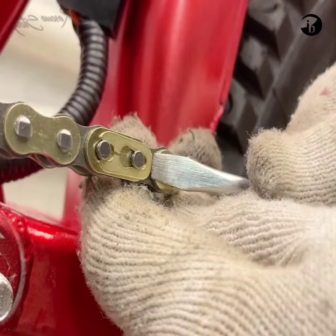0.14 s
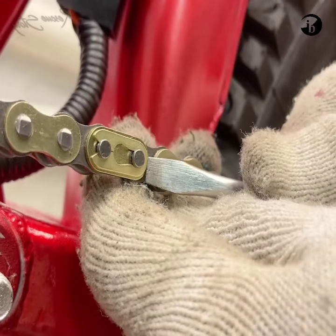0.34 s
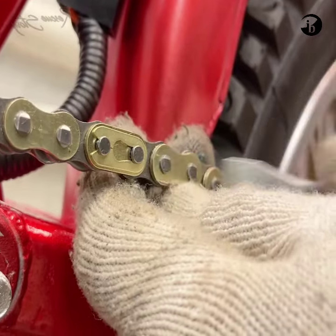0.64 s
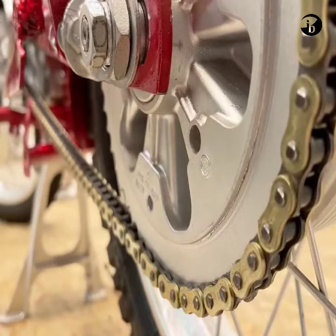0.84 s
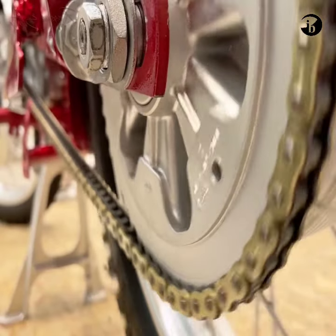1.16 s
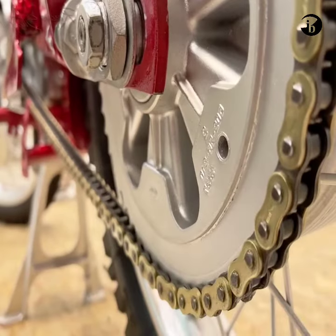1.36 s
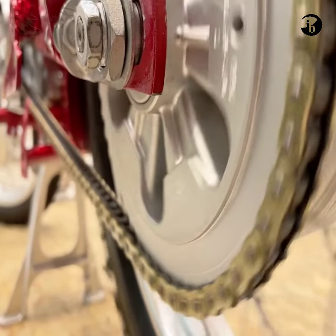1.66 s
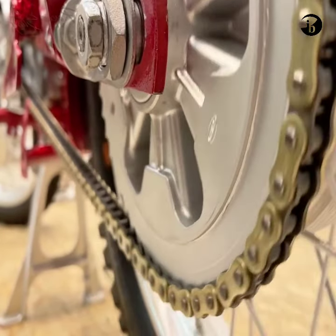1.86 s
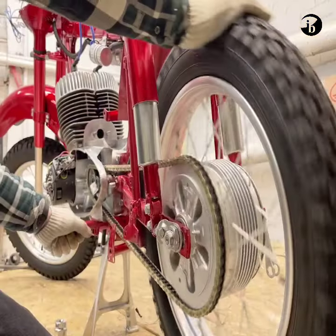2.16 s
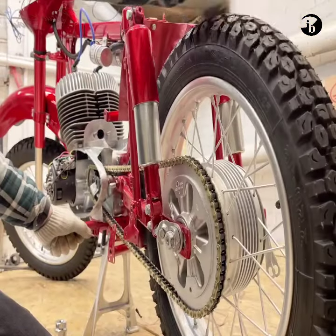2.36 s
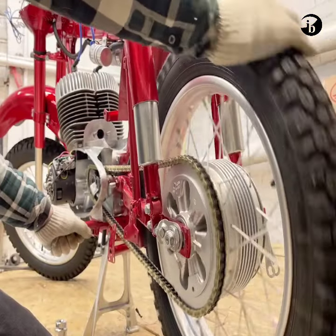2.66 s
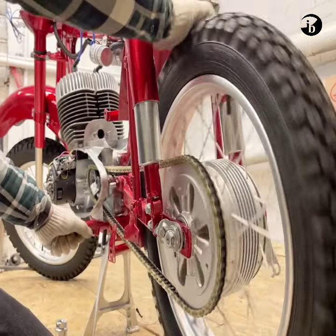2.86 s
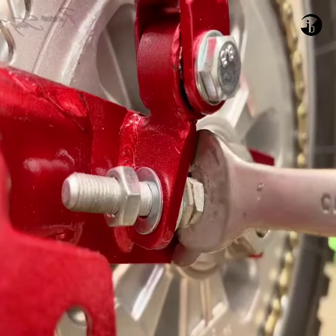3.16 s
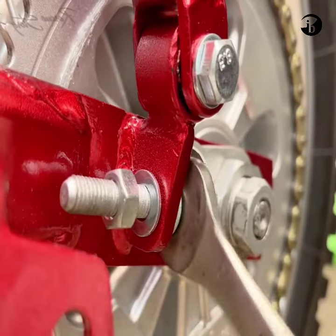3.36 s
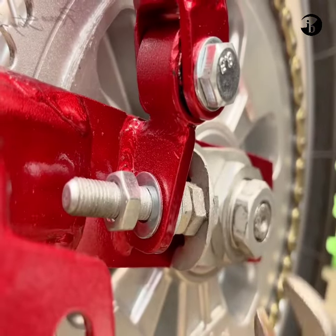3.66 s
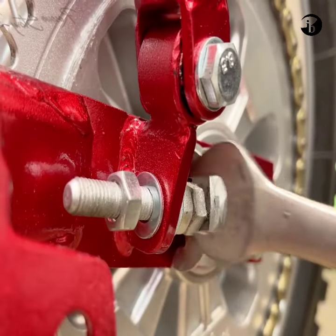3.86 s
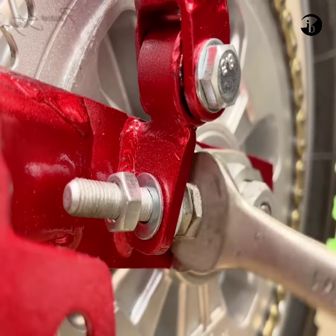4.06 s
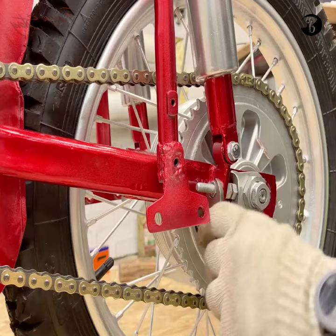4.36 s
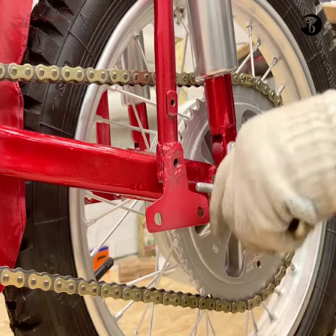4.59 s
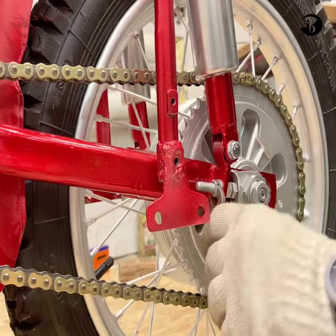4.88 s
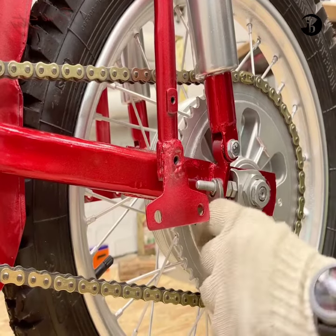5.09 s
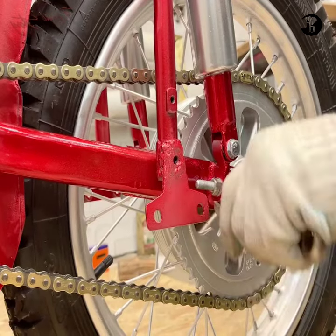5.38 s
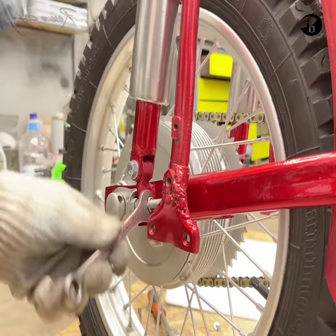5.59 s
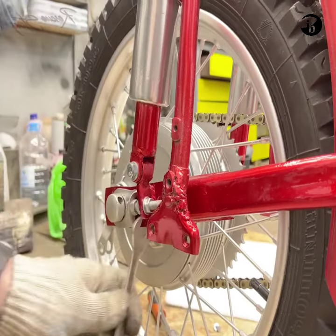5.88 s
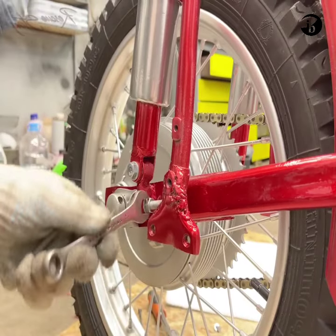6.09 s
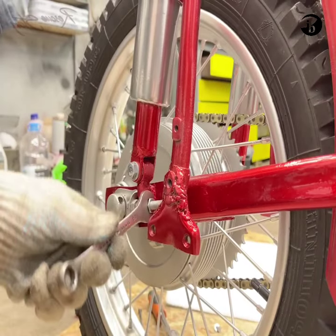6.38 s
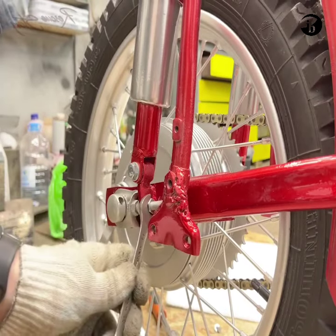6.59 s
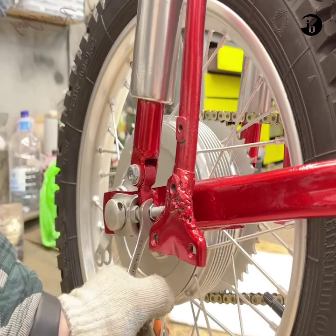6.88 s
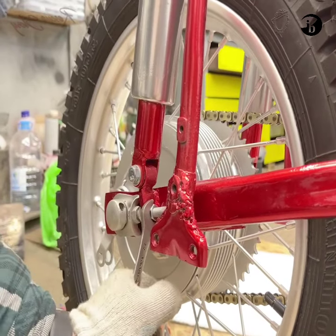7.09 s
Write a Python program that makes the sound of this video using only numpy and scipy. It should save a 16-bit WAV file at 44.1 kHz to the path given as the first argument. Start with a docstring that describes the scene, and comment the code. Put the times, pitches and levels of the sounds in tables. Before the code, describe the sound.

Close up in a small workshop, a clip on a motorcycle chain seats with tiny steel clicks and a dull knock over a fan-like hum. The wheel is then pushed four times, its chain rattling and knocking in swells. At about three seconds the hum stops abruptly, leaving quiet air, sharp ringing spanner clinks on nuts and brief gritty rustles.

```python
"""Fitting a motorcycle drive chain

In a small workshop, close to the microphone and in a few short scenes, a master link's spring clip snaps home:
quick steel clicks over a dull knock. Four pushes turn the wheel, and link knocks ring it while rollers rattle.
The workshop hum cuts off; an open spanner clinks (ringing steel) on the adjuster nuts, amid swells of grainy noise.
Behind lie coloured noise for fan, hum, still air and rumble, wavering tones, and short echoes from the room."""
import sys
import numpy as np
from scipy import signal
from scipy.fft import rfft, irfft
from scipy.io import wavfile

SR = 44100
rng = np.random.default_rng(int(sys.argv[2]) if len(sys.argv) > 2 else 0)


def file_out(sig):
    """Save sig as 16-bit WAV at sys.argv[1]."""
    # one column per channel
    cols = np.atleast_2d(sig).T
    # limit, then scale
    lim = np.clip(cols, -1, 1)
    pcm = np.round(lim * 32767).astype(np.int16)
    wavfile.write(sys.argv[1], SR, pcm)


N = 319284
TIME = np.arange(N) / SR
# the wheel work begins, is heard from farther back, and ends as the hum stops (s)
WHEEL_S, STEP_BACK_S, HUM_STOPS_S = .78, 1.94, 3.02


def from_db(db):
    """Decibels to amplitude ratio."""
    return 10 ** (np.asarray(db) / 20)


def rms_one(x):
    """Scale to an rms of 1 over all channels."""
    return x / np.sqrt(np.mean(x ** 2) + 1e-20)


def at_hz(points, hz):
    """Read a spectrum table on a log-frequency axis."""
    table = np.array(points)
    return np.interp(np.log(hz + 1e-3), np.log(table[:, 0]), table[:, 1])


def cut(x, hz, kind, order=2):
    """Butterworth filter."""
    return signal.sosfilt(signal.butter(order, hz, kind, fs=SR, output="sos"), x)


def during(start, end):
    """A gate with 5 ms edges."""
    return np.clip(np.minimum(TIME - start, end - TIME) / .005 + .5, 0, 1)


def drift(rate):
    """Slow chance of rms 1, with `rate` random knots per second."""
    knots = rng.standard_normal(int(N / SR * rate) + 2)
    return rms_one(np.interp(TIME * rate, np.arange(len(knots)), knots))


def left_right(mid, side, alike):
    """Mix two unrelated signals into left and right channels of the given correlation."""
    return np.sqrt(1 + alike) * mid + np.sqrt(1 - alike) * side * [[1], [-1]]


def coloured(pair, spectrum):
    """Two unrelated signals become a stereo sound of the given colour, rms 1."""
    # how alike left and right are: f/Hz, correlation [0-1]
    likeness = [(60, 0.79), (300, 1), (1500, 0.29), (2400, 0.79), (4500, .93), (14000, 1)]
    hz = np.arange(N // 2 + 1) * SR / N
    alike = np.clip(at_hz(likeness, hz), 0, .999)
    mid, side = rfft(pair) * from_db(at_hz(spectrum, hz))
    return rms_one(irfft(left_right(mid, side, alike), N))


def noise(spectrum):
    """Steady stereo noise of the given colour, rms 1."""
    return coloured(rng.standard_normal((2, N)), spectrum)


def grains(per_s, spread_db):
    """Two trains of random tiny impulses of uneven size and either sign."""
    sizes = from_db(spread_db * np.minimum(rng.exponential(1, (2, N)), 4))
    sizes = sizes * rng.choice([-1, 1], (2, N))
    return rms_one(sizes * (rng.random((2, N)) < per_s / SR))


def ringing(modes, t, vary_db=0, detune=0):
    """Decaying sines; each blow gives every mode its own strength, and the grip shifts its pitch."""
    hz, db, t60 = np.transpose(modes)[:, :, None]
    strength, shift = rng.standard_normal((2, len(modes), 1))
    sign = (-1) ** np.arange(len(modes))[:, None]
    decay = from_db(db + vary_db * strength - 60 * t / t60)
    return np.sum(sign * decay * np.sin(2 * np.pi * hz * (1 + detune * shift) * t), axis=0)


def add(out, s, sound):
    """Lay a sound into the scene at s seconds."""
    at = round(s * SR)
    out[..., at:at + sound.shape[-1]] += sound[..., :N - at]


def hum(lines, waver_db=6.5):
    """Tones whose level and phase waver at random."""
    out = 0
    for hz, db in lines:
        level = from_db(db + waver_db * drift(5.4)) * np.sqrt(2)
        out = out + level * np.sin(2 * np.pi * hz * TIME + 0.33 * drift(24))
    return out


def background():
    """Fan and shop hum, as coloured noise and tones, change with each scene, then leave still air and rumble."""
    # the quiet gives way to a wider view, then to the far side of the wheel
    wider_s, far_side_s = 4.3, 5.5
    # noise colour behind each scene, fan to still air, then the low rumble: f/Hz, level/dB
    fan = [(24, -73.5), (40, -36), (209, -6.5), (372, -6.5), (433, -12), (615, -11.5), (965, -20),
           (1090, -15.5), (1520, -25.5), (2500, -23.5), (3650, -31.5), (5310, -33), (12500, -50.5),
           (14500, -56.5), (16000, -62.5)]
    shop_hum = [(18, -46.5), (30, -11), (215, 3.5), (345, -9), (404, -10), (540, -12), (801, -31),
                (1350, -12), (1500, -12), (1860, -18), (3060, -26), (3490, -26), (7870, -43), (16000, -27)]
    shop_hum_far = [(18, -59), (30, -21), (179, 7), (295, -2), (384, -12), (461, -2.5), (666, -15),
                    (1250, -13), (1430, -35), (1860, -9.5), (2680, -24.5), (3580, -20), (16000, -72)]
    quiet = [(18, -24), (30, 0), (273, 4.5), (526, -3), (1350, -12), (7090, -18), (9970, -17), (13700, -20),
             (14800, -32), (16000, -13)]
    still = [(18, -40.5), (30, -36), (90, 4), (210, 3), (600, -11), (3310, -23.5), (3870, -20.5),
             (5900, -28), (7090, -28), (16000, -28.5)]
    rumble = [(18, -53), (30, -27), (45, -13.5), (99, 5.5), (179, -7.5), (289, -18), (443, -19.5),
              (523, -48.5), (800, -30), (1040, -63), (1760, -120)]
    # spells of rumble behind the spanner work: start t/s, end t/s, level/dB
    rumble_spells = [(4.355, 4.903, -76.5), (5.502, 6.209, -61), (6.211, 6.649, -66.5), (6.912, 6.965, -56),
                     (7.03, 7.3, -55.5)]
    # tones of the fan, of a mains hum, and of a faint higher hum that outlasts it: f/Hz, level/dB
    fan_tones = [(209.9, -59), (376.8, -61.5), (468.3, -68), (602.9, -74), (1830, -79), (2480, -70.5)]
    mains = [(60, -63), (120, -65), (150.7, -68.5), (226.1, -70)]
    late_hum = [(283, -72)]

    out = (from_db(-47) * noise(fan) + hum(fan_tones)) * during(-np.inf, WHEEL_S)
    out += from_db(-47) * noise(shop_hum) * during(WHEEL_S, STEP_BACK_S)
    out += from_db(-46.5) * noise(shop_hum_far) * during(STEP_BACK_S, HUM_STOPS_S)
    out += from_db(-73.5) * noise(quiet) * during(HUM_STOPS_S, wider_s)
    out += from_db(-67.5) * noise(still) * during(wider_s, np.inf)
    out += noise(rumble) * sum(from_db(db) * during(start, end) for start, end, db in rumble_spells)
    out += hum(mains, waver_db=3.0) * during(far_side_s, 6.05)
    out += hum(late_hum, waver_db=1.0) * during(far_side_s, 6.7)
    return out


def workshop(x, t60=0.15, treble_t60=0.13, treble_db=-4, split_hz=6500, alike=0.37):
    """Diffuse echoes from benches and walls, as decaying noise; the treble dies first."""
    t = np.arange(SR // 2) / SR
    mid, side = rng.standard_normal((2, len(t)))
    wash = left_right(mid, side, alike) * np.clip(t / 0.0013, 0, 1)
    echo = cut(wash, split_hz, "low") * from_db(-60 * t / t60)
    echo = echo + cut(wash, split_hz, "high") * from_db(treble_db - 60 * t / treble_t60)
    echo = echo / np.sqrt(np.sum(echo ** 2) / 2)
    return signal.fftconvolve(x[None], echo, axes=1)[:, :N]


def spring_clip(crack_db=-15, crack_s=0.0004, buzz_db=-15, buzz_t60=0.074, buzz_top_db=-28):
    """Very quick steel clicks, a buzz of the loose links, and the dull knock of the chain, damped by the glove."""
    snap = [(0.2599, 4.5), (0.2611, 4.5), (0.263, -3.5)]
    # ringing of clip and side plate: f/Hz, level/dB, t60/s
    clip_modes = [(2550, -19.5, 0.0054), (3850, -23.5, 0.022), (4370, -19, .008), (5340, -12.5, .011),
                  (5717, -16, 0.022), (6720, -24, 0.011), (7660, -21, 0.0061), (13290, -25, 0.011),
                  (14510, -22, 0.0053)]
    # the knock sent through chain and swing arm: f/Hz, level/dB, t60/s
    knock_modes = [(214, -13, 0.049), (320, -10.5, .025), (580, -8, 0.012), (835, -11, 0.017),
                   (1430, -5.5, 0.0031)]
    knock_s = .2617
    out, t = np.zeros(N), np.arange(SR // 8) / SR
    for s, db in snap:
        crack = rng.standard_normal(len(t)) * from_db(crack_db) * np.exp(-t / crack_s)
        add(out, s, from_db(db) * (ringing(clip_modes, t) + crack))
    buzz = rng.standard_normal(len(t)) * from_db(-60 * t / buzz_t60)
    add(out, knock_s, from_db(buzz_db) * cut(buzz, (4900, 6600), "band"))
    add(out, knock_s, from_db(buzz_top_db) * cut(buzz, (12700, 15000), "band"))
    thud = from_db(-17.5 - 60 * t / 0.035) * cut(rng.standard_normal(len(t)), (600, 3000), "band")
    add(out, knock_s, cut(ringing(knock_modes, t) + thud, 160, "high"))
    return out


def chain(top_links_per_s=150, link_db=-12.0, wheel_db=-4, knock_db=-1, roller_db=-7, flutter_db=1.27,
          split_hz=2600, lurch_db=0.66, slap_size=14, slap_decay_s=0.0078):
    """Links drop onto the teeth and ring the wheel; loose rollers rattle in between; faster is louder."""
    # the hand pushes the wheel round: start t/s, fastest t/s, end t/s, relative level at top speed/dB
    pushes = [(.88, 1.129, 1.319, -27.5), (1.521, 1.72, 2.0, -28.5), (2.019, 2.25, 2.41, -31.5),
              (2.63, 2.82, 3.025, -31.5)]
    # the slack run of chain slaps: t/s, relative level/dB
    slaps = [(1.194, -39.5), (1.632, -34), (2.787, -30.5)]
    # resonances of sprocket, hub and spokes: f/Hz, width/Hz, level/dB
    wheel_modes = [(304.1, 7.8, 10), (331, 23, 2), (475.6, 8.1, 9.5), (537, 68, 0), (732, 50, 0),
                   (1203, 39, -6), (1136, 15, -33), (1537, 55, -4), (1430, 77, 0), (2195, 21, -6)]
    # chain colour beside the sprocket, then from farther back: f/Hz, level/dB
    chain_near = [(24, -48), (40, -13), (118, -1.5), (249, -14), (305, -1.5), (354, -4), (467, -5),
                  (1240, -12.5), (1340, -8.5), (1480, -13.5), (1810, -23), (8990, -27.5), (10200, -29.5),
                  (14800, -27), (16000, -32.5)]
    chain_far = [(24, -57), (40, -70), (87, -1), (237, -16.5), (329, -12), (382, -6), (491, -3), (1090, -9),
                 (1550, -2), (1810, -25), (2150, -11), (2910, -24), (4240, -20.5), (14500, -28.5),
                 (16000, -30)]
    creep_db, creep_far_db = -53, -56.5   # the chain creeps on between pushes
    knock_power, roller_power = 2, 1.84   # loudness grows as these powers of the speed

    near = during(0, STEP_BACK_S)
    knocks = near * from_db(creep_db) + (1 - near) * from_db(creep_far_db)
    rollers, speed = knocks, .1
    for start, fastest, end, db in pushes:
        # each push speeds up and dies away
        push = np.abs(np.sin(np.pi * np.interp(TIME, [start, fastest, end], [0, .5, 1])))
        speed = np.maximum(speed, push)
        knocks = np.hypot(knocks, from_db(db) * push ** knock_power)
        rollers = np.hypot(rollers, from_db(db) * push ** roller_power)
    for s, db in slaps:
        knocks = knocks + from_db(db) * (TIME >= s) * np.exp(-np.abs(TIME - s) / slap_decay_s)

    # running count of links; each whole number is one link seating on a tooth
    links = np.cumsum(top_links_per_s * speed * (1 + .2 * drift(90))) / SR
    seated = np.diff(np.floor(links), prepend=0) * from_db(2 * rng.standard_normal(N))
    force = grains(12000, 1.7) * from_db(1.75 * drift(70) + lurch_db * drift(29.93))
    force = force + from_db(link_db) * rms_one(seated) * [[1], [0]]
    for s, db in slaps:
        force[0, round(s * SR)] += slap_size
    # the rollers' tiny contacts merge into a rush that swells as each link seats
    rush = grains(22000, 1.3) * from_db(flutter_db * (np.cos(2 * np.pi * links) + 1.08 * drift(120)))
    rattle = near * coloured(force, chain_near) + (1 - near) * coloured(force, chain_far)
    fizz = near * coloured(rush, chain_near) + (1 - near) * coloured(rush, chain_far)

    wheel = np.zeros((2, N))
    for hz, width, db in wheel_modes:
        wheel += from_db(db) * signal.lfilter(*signal.iirpeak(hz, hz / width, fs=SR), force)
    wheel = rms_one(wheel[0] + 0.067 * wheel[1] * [[1], [-1]])   # nearly central
    body = cut(rattle, split_hz, "low", order=3) + from_db(wheel_db) * wheel
    body /= np.std(cut(body, (280, 2000), "band"))
    treble = rms_one(cut(fizz, split_hz, "high", order=3))
    sound = from_db(knock_db) * knocks * body + from_db(roller_db) * rollers * treble
    return sound * during(WHEEL_S, HUM_STOPS_S)


def grainy_swells(flicker_db=2.0):
    """Dense random impulses, filtered to a grain and a treble hiss, swell and fade with a flickering level."""
    # swells of grainy noise, some around the clinks: start t/s, end t/s, grain level/dB, treble hiss level/dB
    swells = [(3.22, 3.299, -63, -57), (3.358, 3.582, -68, -60.5), (3.574, 3.64, -49.5, -47),
              (3.663, 3.795, -68, -65), (3.93, 3.958, -46, -47), (4.064, 4.157, -63.5, -58),
              (4.19, 4.483, -63, -59), (4.618, 4.668, -56, -67), (4.78, 4.847, -40.5, -52),
              (4.877, 5.021, -59, -70), (5.046, 5.108, -66, -76), (5.345, 5.428, -51, -68),
              (5.507, 5.562, -56.5, -58), (5.811, 5.881, -52, -67), (6.066, 6.128, -40.5, -34),
              (6.688, 6.719, -44.5, -42)]
    # colour of the grain, then of the treble hiss: f/Hz, level/dB
    grain_colour = [(250, -15), (450, -3), (1500, -3.5), (3000, 1), (4600, 2.5), (7000, 1), (9500, -9.5),
                    (16000, -24)]
    hiss_colour = [(5000, -23.5), (9000, -18), (12500, 1.5), (16000, 7)]
    grain, hiss = np.zeros((2, N))
    for start, end, grain_db, hiss_db in swells:
        swell = np.sin(np.pi * np.clip((TIME - start) / (end - start), 0, 1)) ** 2
        grain += from_db(grain_db) * swell
        hiss += from_db(hiss_db) * swell
    sound = grain * coloured(grains(7000, 3.8), grain_colour)
    sound = sound + hiss * coloured(grains(12000, 2.3), hiss_colour)
    return from_db(flicker_db * drift(180)) * sound


def spanner(crack_db=20, crack_s=0.00058, frame_db=1, frame_t60=.055, bounce_db=-9, onset_db=1, onset_s=0.0016,
            width=0.29, part_db=-1, part_t60=0.016, part_lift_db=2, part_width=0.091):
    """A soft noise onset, a hard click and a chatter of micro-bounces; the touched part rings and sets the colour."""
    # steel touching steel: t/s, level at 2-5.5 kHz/dB, chatter decay/s,
    # body/dB and treble/dB (both relative to the level), ring of the touched part f/Hz
    clinks = [(.4216, -58.5, 0.00085, -10, -2, 4600), (.8551, -53.5, .001, -10, -6, 5230),
              (0.905, -50.5, .001, 5, 4.5, 2300), (2.0587, -52, .0007, 3, 12, 6500),
              (3.0541, -44, .0006, -20, -8.5, 7490), (3.0844, -36.5, .004, -15.5, -26, 2600),
              (3.092, -42.5, .0006, -7, 11.5, 7750), (3.1027, -45.5, .0016, -8, -25, 2430),
              (3.2918, -27.5, .00036, -12, -25.5, 5370), (3.9103, -42, .0007, -5, -20, 3120),
              (3.934, -45.5, 0.0067, -27, 1, 4620), (4.139, -24.5, .00046, -16.5, -28.5, 7000),
              (4.1713, -34, 0.00087, -18, -9.5, 4800), (4.3933, -43, .0023, -2.5, 0.5, 2490),
              (4.517, -58.5, .0009, -17, 0, 4880), (4.6699, -35.5, 0.0061, -16, -4, 6460),
              (4.7881, -30.5, 0.0068, -19, -1.5, 4550), (4.794, -30, .004, -12.5, 3, 5200),
              (4.8314, -30, 0.01, -10, -15, 4620), (4.932, -54, .0019, -8, -28, 3120),
              (4.9558, -51, .001, -15, -11, 3510), (5.0597, -45.5, .0011, -7.5, -43, 3370),
              (5.3771, -38.5, .0027, -16.5, 1.5, 7000), (5.5158, -33.5, .0015, -13.5, -41, 3770),
              (5.824, -47.5, 0.022, -9, -35.5, 4700), (6.0, -39.5, .0035, -4.5, -32.5, 4300),
              (6.0459, -35, 0.01, -22.5, -24.5, 4450), (6.0629, -23.5, .001, -20.5, -12, 4580),
              (6.0878, -23.5, 0.0039, -14.5, 0.5, 4450), (6.1537, -37, .0058, -19.5, -17, 4450),
              (6.1841, -29.5, .0017, -24.5, -8, 4660), (6.2551, -50.5, .001, -23, -16.5, 3100),
              (6.2927, -45.5, .0005, -11.5, -9, 3340), (6.6972, -51.5, .003, -26, -6, 9100),
              (6.7842, -64.5, .0037, 1.5, 3, 4800), (7.0337, -66.5, 0.0017, 10, -5, 1850),
              (7.0929, -62, .003, 0.5, 3.5, 4600), (7.1828, -64, .0028, -8.5, -19.5, 3000)]
    # edges between body, level, bright and treble bands: f/Hz
    band_edges = [2000, 5500, 10500]
    # spanner, nut and frame ringing together: f/Hz, level/dB, t60/s
    steel = [(864, -10, 0.041), (1225, -5.5, 0.036), (1730, -14.5, 0.031), (2750, -17, 0.044),
             (3220, -2.5, 0.024), (3690, -6.5, 0.024), (4476, -1, 0.029), (5350, -11.5, 0.012),
             (6340, 4, 0.011), (6960, 6.5, 0.016), (7630, 15.5, 0.011), (9300, 3, 0.031),
             (11800, -9.5, .02), (13200, -7.5, .02), (14700, 6.5, 0.02), (15800, 9, 0.017)]
    # the bright band follows the treble by a share, and rises where a small, high part is touched
    bright_base_db, bright_share, small_part_hz, small_part_db_per_oct = 0.5, 0.43, 4650, 10

    out, t = np.zeros((2, N)), np.arange(SR // 6) / SR
    lead, part_spread = SR // 100, 1 + part_width   # 10 ms are kept for the onset
    low, middle, high = band_edges
    bands = [(90, low), (low, middle), (middle, high), (high, 17000)]
    for s, level_db, chatter_s, body_db, treble_db, ring_hz in clinks:
        crack, crack_side, frame, frame_side, bounce, soft = rng.standard_normal((6, len(t)))
        bounces = bounce * (rng.random(len(t)) < 5000 / SR)
        force = from_db(bounce_db) * bounces * np.exp(-t / chatter_s)
        force[0] = 1   # the first, hard contact
        metal = ringing(steel, t, vary_db=4.5, detune=0.04) + ringing([(ring_hz, part_db, part_t60)], t)
        click = crack + width * crack_side * [[1], [-1]]
        metal = metal + from_db(crack_db) * click * np.exp(-t / crack_s)
        frame_modes = frame + width * frame_side * [[1], [-1]]   # many close modes, as noise
        metal = metal + from_db(frame_db - 60 * t / frame_t60) * frame_modes
        # a soft noise onset of about 2 ms swells up to the click: a decay played backwards
        onset = (from_db(onset_db) * soft * np.exp(-t / onset_s))[:lead][::-1]
        struck = signal.fftconvolve(force[None], metal, axes=1)[:, :len(t)]
        touch = np.hstack([[onset, onset], struck])
        # lift the touched part's close modes
        part_band = (ring_hz / part_spread, ring_hz * part_spread)
        touch = touch + from_db(part_lift_db) * cut(touch, part_band, "band", order=1)
        touch = cut(touch, 270, "high", order=1)   # small parts radiate little bass
        octaves_up = max(np.log2(ring_hz / small_part_hz), 0)
        bright_db = bright_base_db + bright_share * treble_db + small_part_db_per_oct * octaves_up
        for band, db in zip(bands, [body_db, 0, bright_db, treble_db]):
            part = cut(touch, band, "band", order=3)
            strength = np.std(part[:, lead:lead + SR // 125])   # over the first 8 ms from the click
            add(out, s - lead / SR, from_db(level_db + db) * part / strength)
    return out


def ports(x):
    """The phone's two microphone ports face different ways, so each band leans and lags a little."""
    # lead of the left port: f/Hz, phase/rad
    port_phase = [(60, 0), (260, -0.5), (860, 0.53), (1380, 0.02), (1750, 0.9), (2400, 0.75), (2900, -.65),
                  (3500, -.55), (4400, -.15), (5500, .28), (7000, .4), (9000, .55), (13000, .6)]
    # left against right: f/Hz, level/dB
    port_balance = [(60, 1.5), (99, -2), (160, -1.5), (270, -3.5), (450, -1), (740, -1.0), (1220, -1),
                    (2010, 1.5), (3330, 0.5), (5500, -0.5), (9080, 0), (15000, -0.5)]
    hz = np.arange(N // 2 + 1) * SR / N
    ratio = np.log(from_db(at_hz(port_balance, hz))) + 1j * at_hz(port_phase, hz)
    return irfft(rfft(x) * np.exp(ratio * np.array([[.5], [-.5]])), N)


def scene(clink_room_db=-11, body_room_db=-6, snap_room_db=-28):
    """The work is close to the microphone, with a little of the workshop's echo behind clinks and snap."""
    clinks, snap = spanner(), spring_clip()
    centre = clinks.mean(axis=0)
    # the frame spreads the low part of each clink into the room
    sent = from_db(clink_room_db) * centre + from_db(body_room_db) * cut(centre, 1890, "low")
    sent = sent + from_db(snap_room_db) * snap
    return background() + workshop(sent) + snap + chain() + grainy_swells() + clinks


def record(dry):
    """Two ports pick it up; the highest peaks are rounded and the top is cut at 16.1 kHz."""
    top_cut = signal.ellip(10, .2, 80, 16100, fs=SR, output="sos")
    return signal.sosfilt(top_cut, np.tanh(ports(dry)))


dry = scene()
out = record(dry)
file_out(out)
```